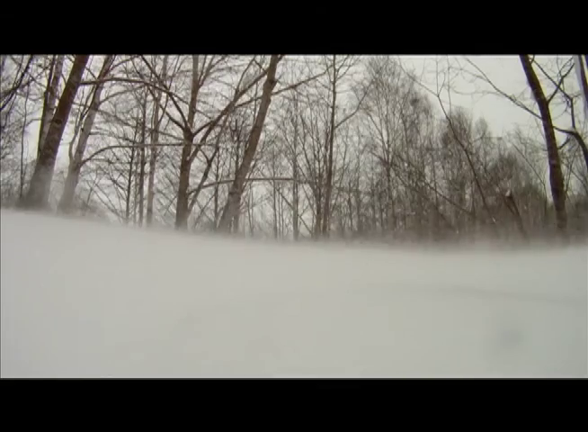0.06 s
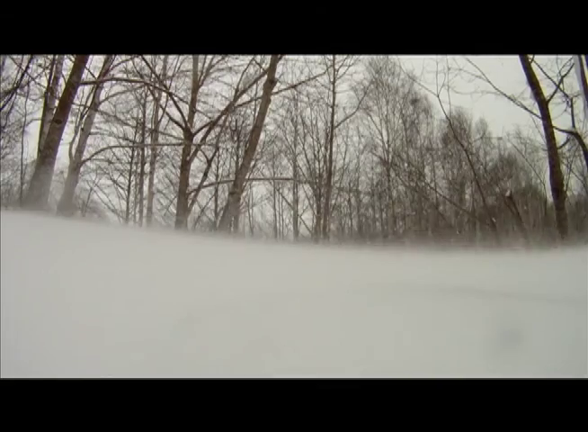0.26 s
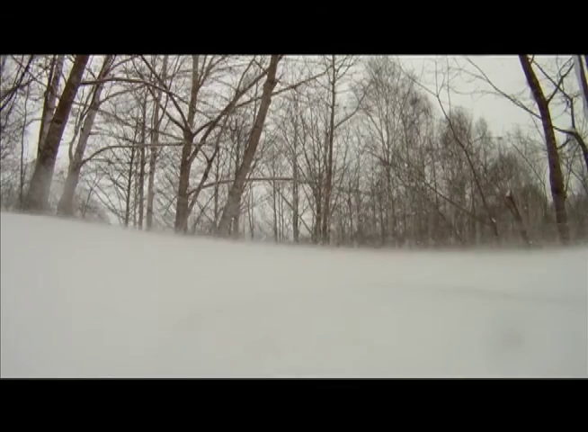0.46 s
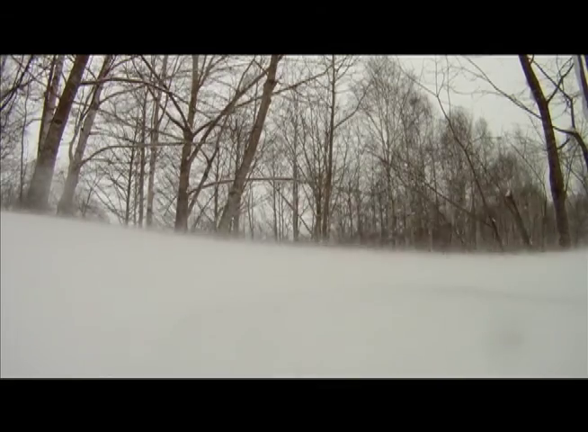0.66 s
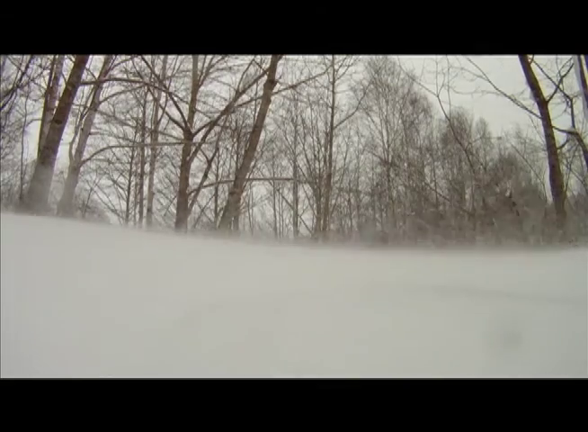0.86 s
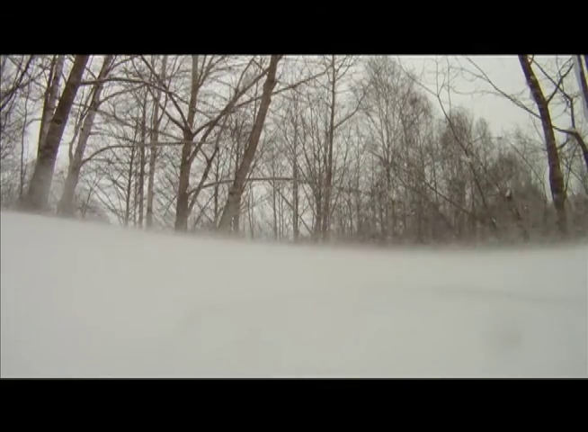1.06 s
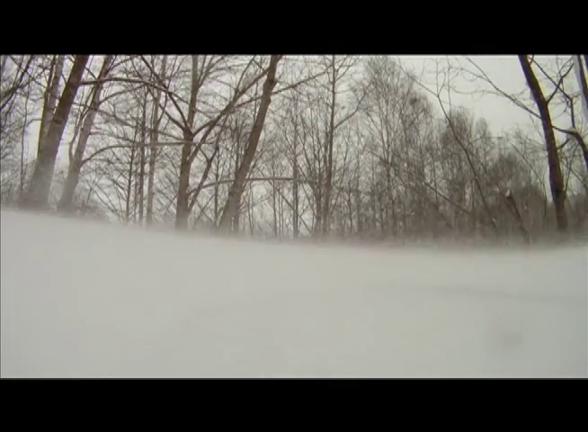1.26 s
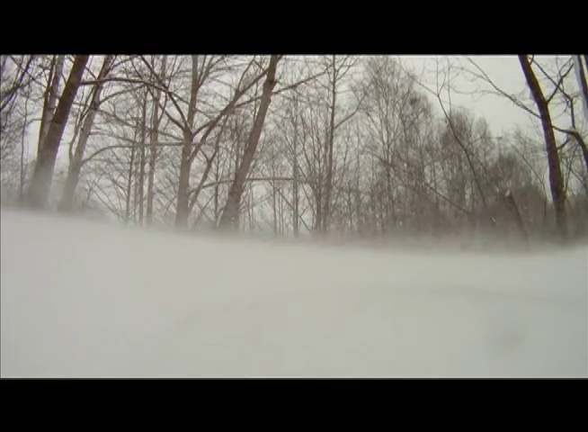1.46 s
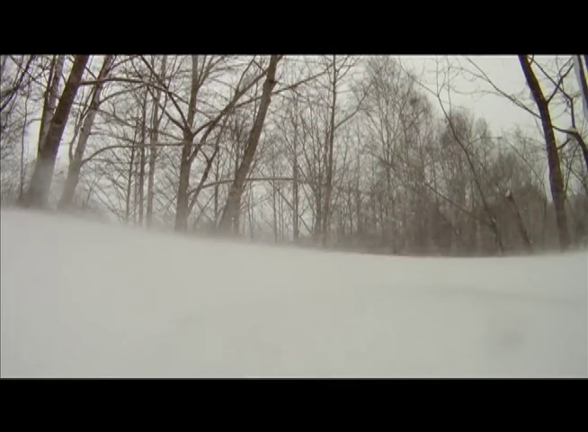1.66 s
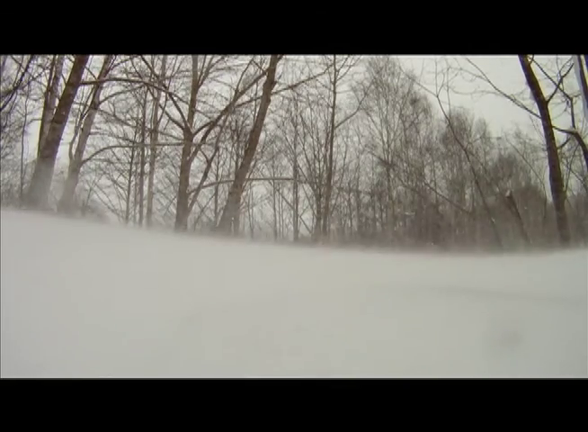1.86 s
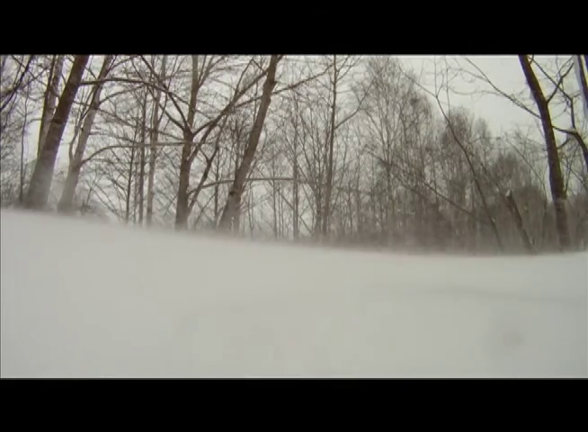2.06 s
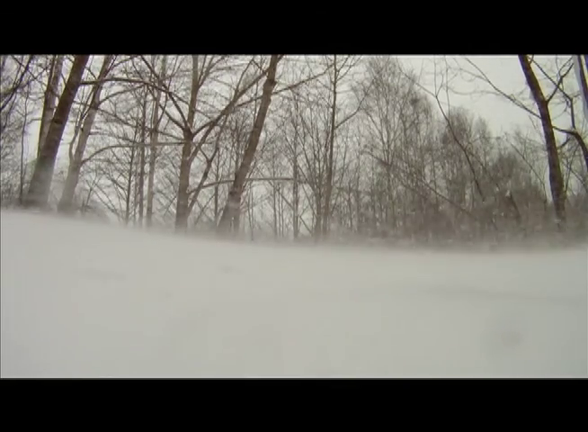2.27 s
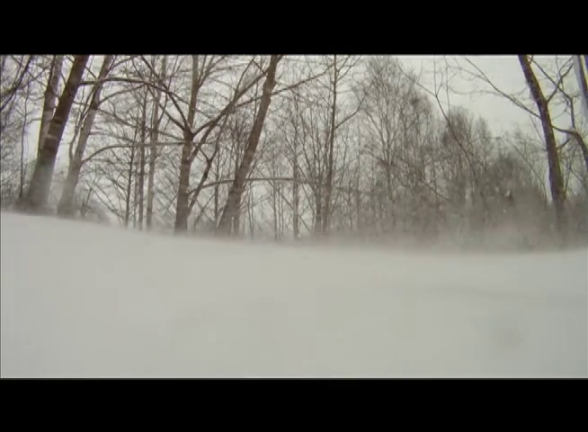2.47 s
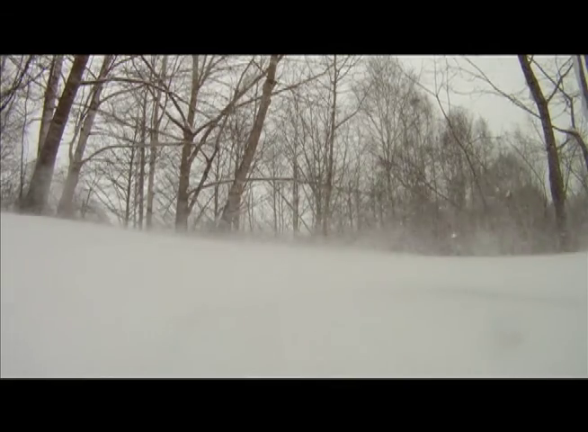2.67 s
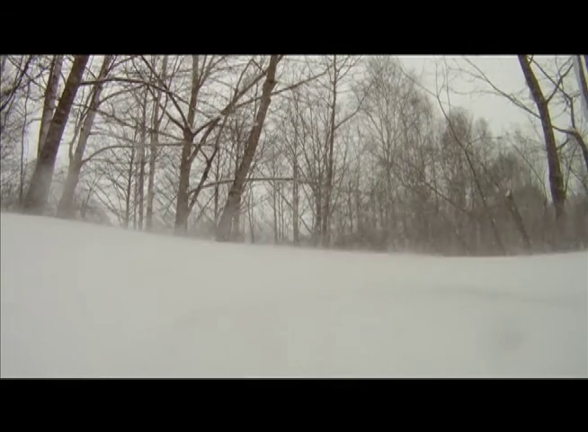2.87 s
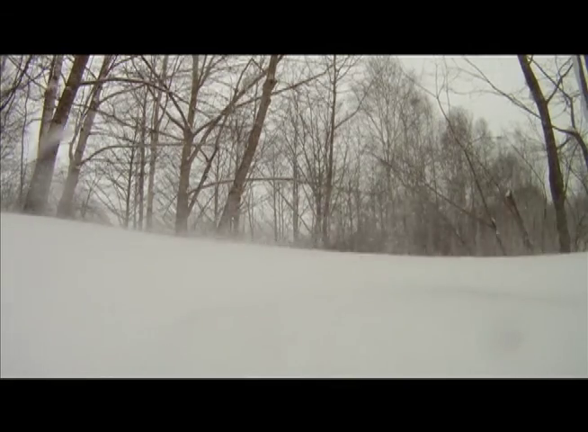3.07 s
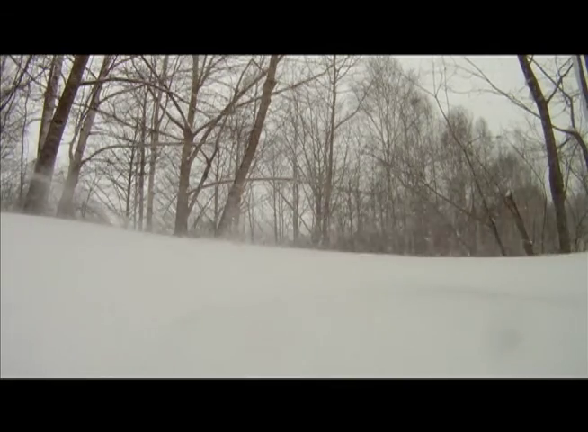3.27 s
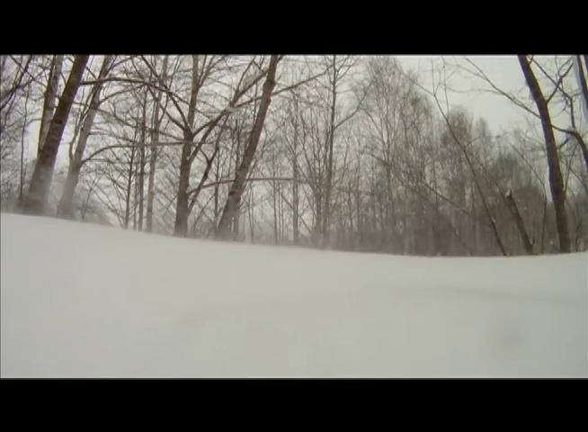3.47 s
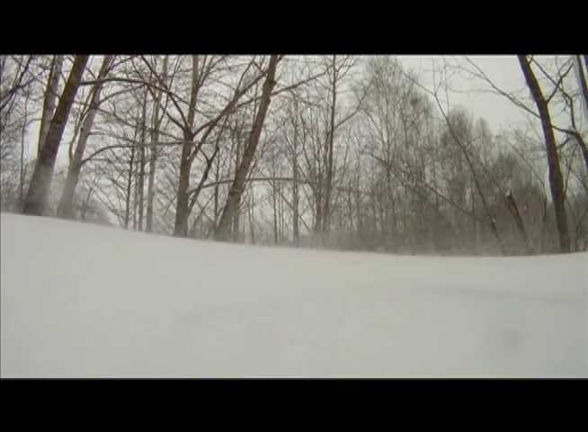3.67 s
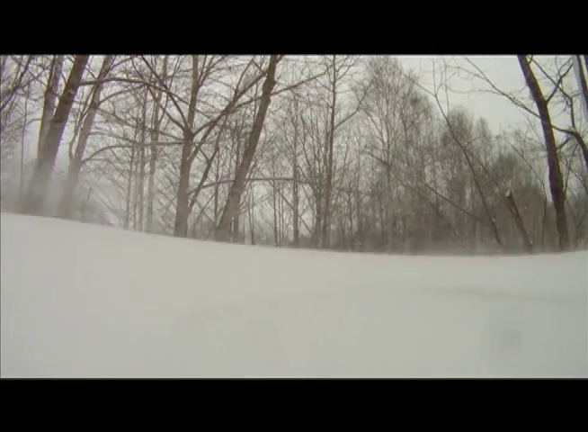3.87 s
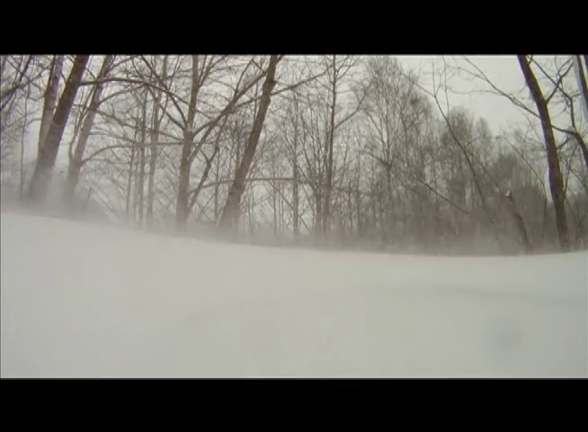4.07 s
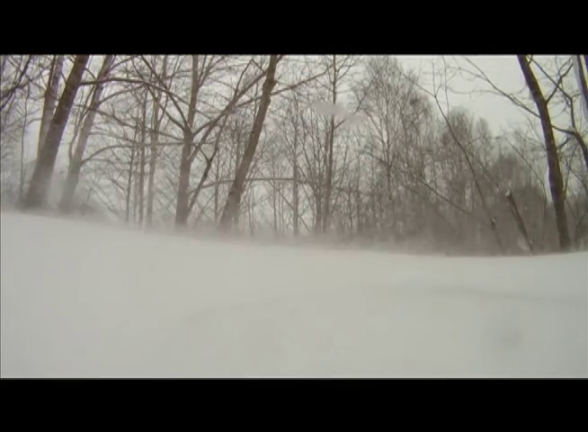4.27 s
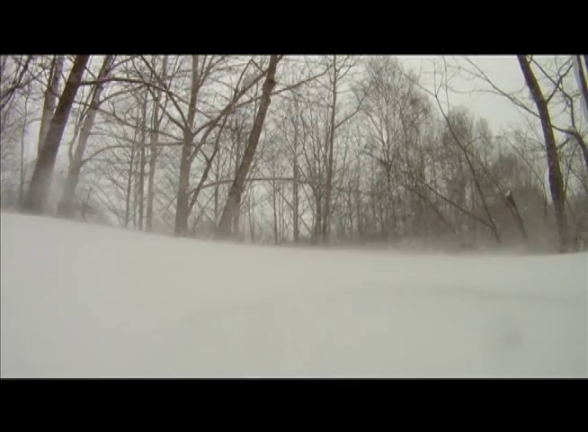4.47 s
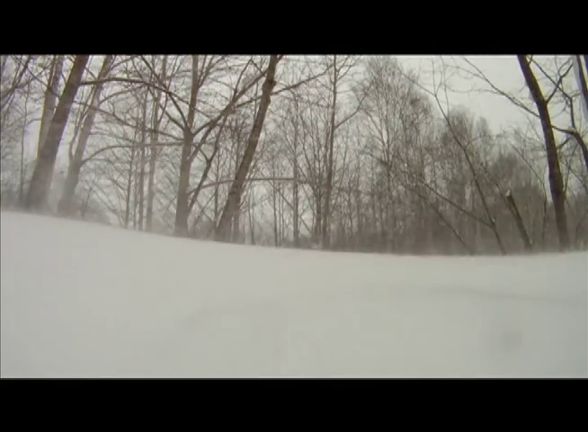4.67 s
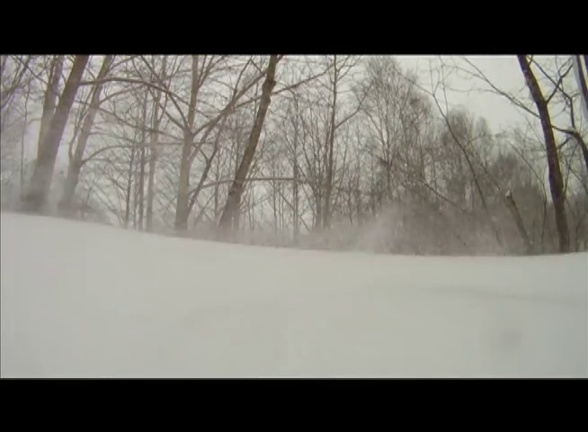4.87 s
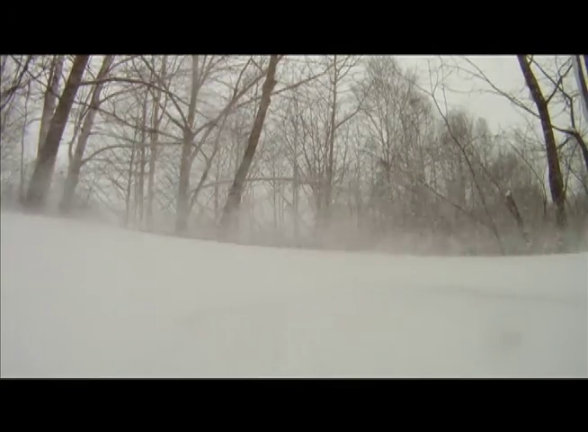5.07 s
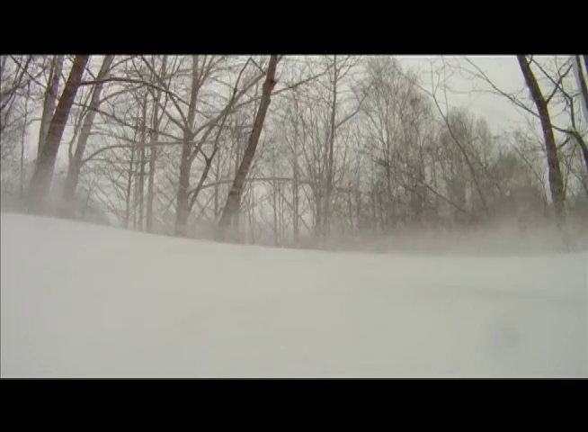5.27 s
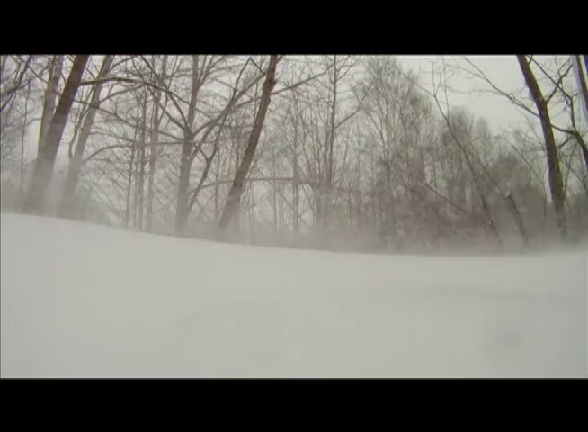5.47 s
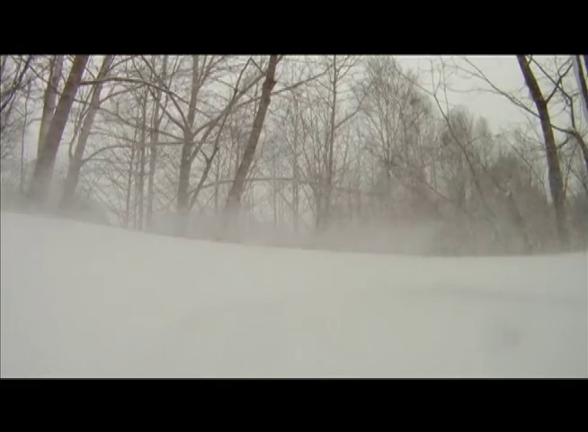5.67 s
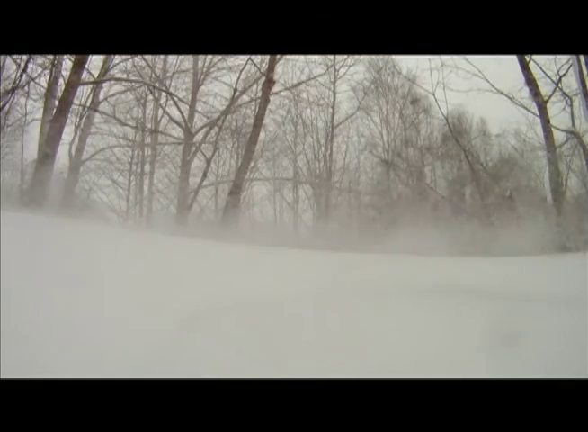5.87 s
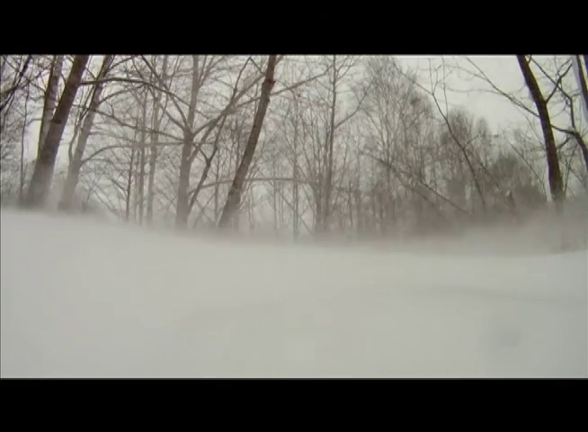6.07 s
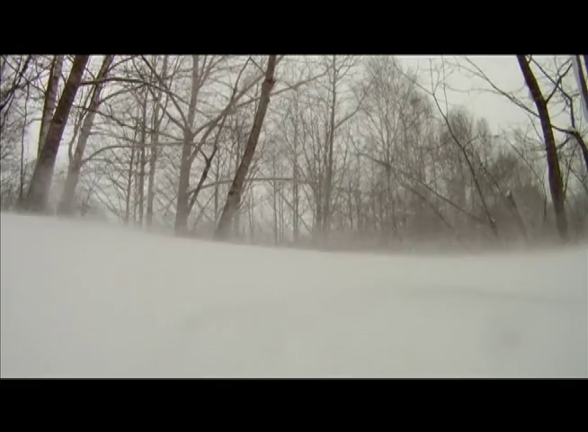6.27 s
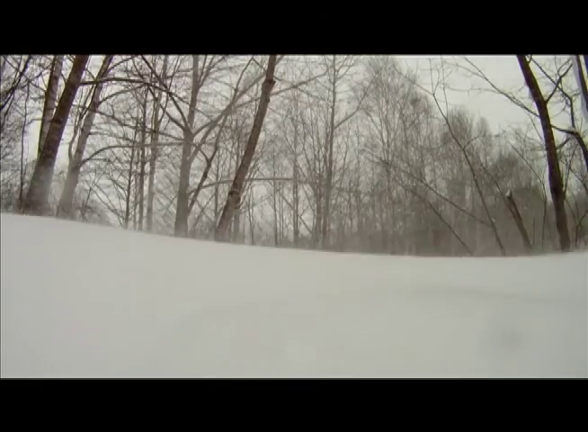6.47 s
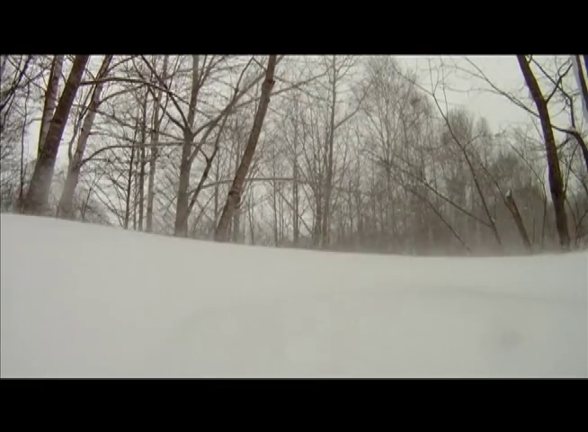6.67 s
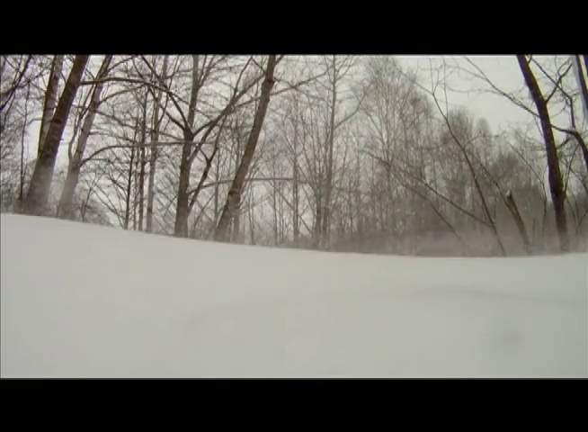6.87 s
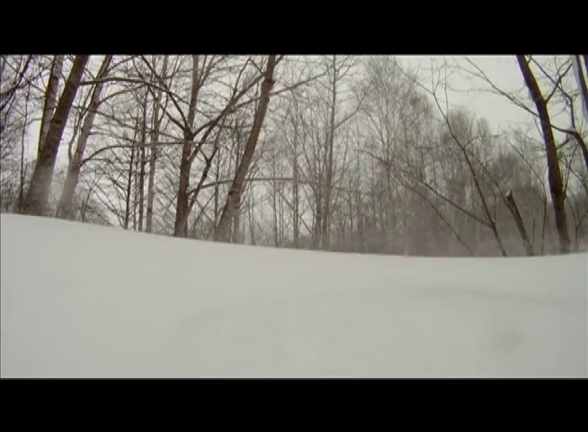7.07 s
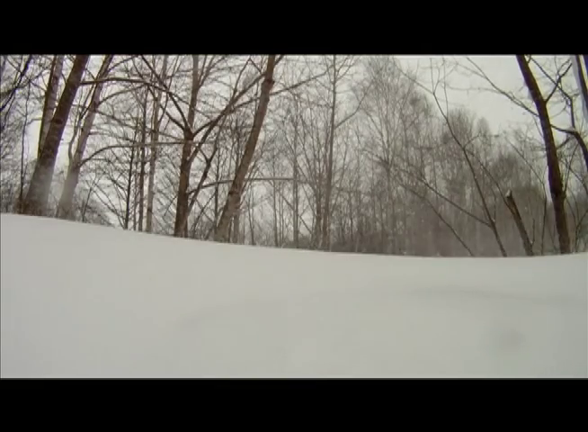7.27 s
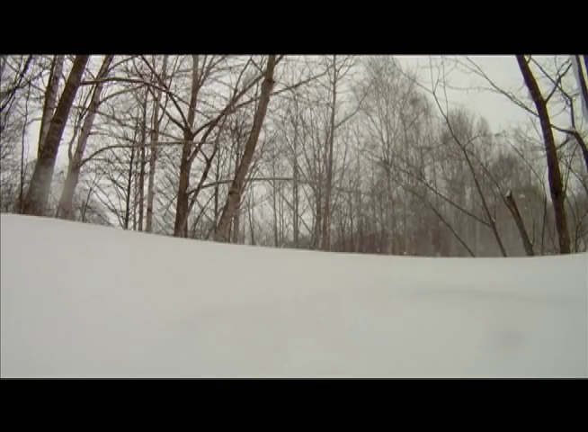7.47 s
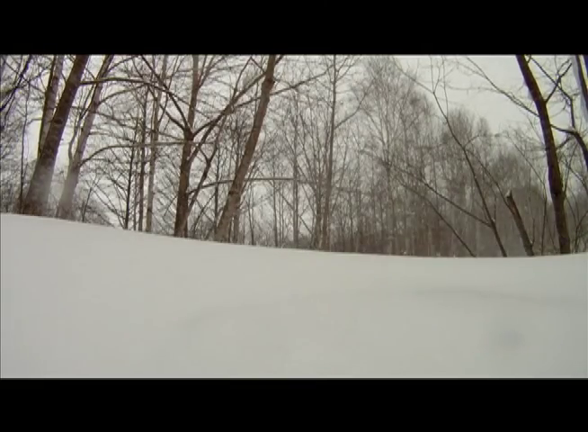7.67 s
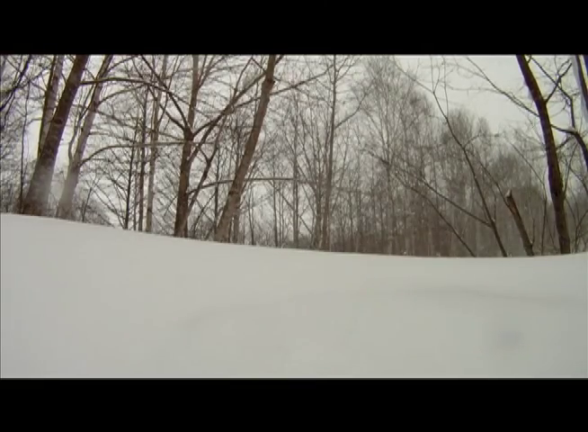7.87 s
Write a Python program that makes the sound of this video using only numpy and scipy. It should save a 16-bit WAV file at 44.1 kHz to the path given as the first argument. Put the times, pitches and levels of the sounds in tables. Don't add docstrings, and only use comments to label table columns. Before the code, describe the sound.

A microphone sealed in a small plastic case lies in blowing snow beside a wood. At the start, low wind pressure thumps and flutters, with scattered hard ticks and short patters. Around 0.9 s a heavy clump cracks loudly on the case, and a dense, crackling spray continues in bursts until about 1.5 s. It thins, then another flurry from 2.2 to 2.8 s brings sharp knocks, crumbling grit and a small glassy ping. From 3 to 4.8 s the wind slackens, leaving sparse ticks and soft puffs. Snow builds again near 4.9 s, becoming a fierce rattling barrage between 5.3 and 6.05 s. It stops quickly; buffeting and a hollow, hissy rush in the trees linger, with a few taps near 6.5 and 7 s. By 7.9 s only faint grains and hiss remain. The sound is close, boxy, and brittle on top.

```python
import sys
import numpy as np
from scipy import signal
from scipy.fft import rfft, irfft, next_fast_len
from scipy.io import wavfile
from scipy.ndimage import uniform_filter1d, map_coordinates

SR = 44100
rng = np.random.default_rng(int(sys.argv[2]) if len(sys.argv) > 2 else 0)


def undo_db(level):
    steps = np.asarray(level, float) / 20
    return 10 ** steps


def wrap_up_sound(samples):
    columns = np.atleast_2d(samples).T
    tamed = np.clip(columns, -1, 1)
    steps = np.round(tamed * 32767).astype(np.int16)
    wavfile.write(sys.argv[1], SR, steps)


N = 349713
CLOCK = np.arange(0, N + 32, 32) / SR


def unit(x):
    return x / np.sqrt(np.mean(x ** 2) + 1e-20)


def steady(x, seconds):
    power = np.abs(uniform_filter1d(x ** 2, size=round(seconds * SR)))
    return x / np.sqrt(power + 1e-9)


def wobble(rate):
    return map_coordinates(rng.standard_normal(N // 100), [np.arange(N) * rate / SR])


def filtered(x, response):
    m = next_fast_len(N + 8192)
    return irfft(rfft(x, m) * response(np.fft.rfftfreq(m, 1 / SR)), m)[..., :N]


def coloured(spectrum, patchy_db):
    z = signal.stft(rng.standard_normal(N), nperseg=512)[2]
    field = uniform_filter1d(rng.standard_normal(z.shape), size=5, axis=0)
    field = uniform_filter1d(field, size=10, axis=1)
    x = signal.istft(z * undo_db(patchy_db * unit(field)), nperseg=512)[1][:N]
    hz, db = np.transpose(spectrum)
    return unit(filtered(x, lambda f: undo_db(np.interp(np.log(f + 1), np.log(hz), db, right=-120))))


def swell(middle_s, peak_db, reach_s):
    return peak_db - 15 * np.abs(CLOCK - middle_s) / reach_s


def summed(rows, swells):
    power = undo_db(np.interp(CLOCK, *rows)) ** 2
    power = power + sum(undo_db(np.maximum(db, -120)) ** 2 for db in swells)
    return np.interp(np.arange(N) / SR, CLOCK, 10 * np.log10(power))


# centre_hz, half_width_hz, lift_db
HOLLOW = [(1090, 126, 4.5), (1510, 120, 1), (2055, 127, 5.5), (2280, 110, 3.5), (2740, 67, 1),
          (3560, 120, 8), (4180, 90, 7), (4980, 110, -4)]


def hollow(hz):
    return undo_db(sum(db * np.exp(-((hz - c) / w) ** 2) for c, w, db in HOLLOW))


# time_s, rush_db
WIND = [(0.1, -56.5), (0.57, -56.5), (1.1, -63), (1.34, -55), (1.94, -64.5), (2.52, -54), (2.69, -59),
        (2.95, -74), (3.24, -72), (3.69, -64.5), (4.55, -69), (5.5, -54), (5.67, -59.5), (6.29, -54.5),
        (6.58, -63.5), (6.78, -55), (7.36, -60.5), (7.93, -83.5)]
# middle_s, slow_pressure_db, flutter_db, reach_s
EDDIES = [(0.0, -37.5, -48, 0.59), (0.2, -29.5, -53, 0.031), (0.62, -36, -55, 0.14),
          (0.748, -66, -50.5, .1), (0.97, -40, -46.5, 0.27), (1.19, -40, -46, 0.19),
          (1.48, -36, -46.5, 0.083), (1.64, -41.5, -74.5, 0.15), (1.92, -42, -56, 0.244),
          (2.22, -47.5, -49, 0.34), (2.31, -40.5, -72, 0.13), (2.45, -40, -64, 0.17),
          (3.66, -44, -59, 0.17), (3.87, -48, -76, 0.23), (4.1, -54.5, -59, 0.32),
          (4.92, -50.5, -54.5, 0.49), (5.23, -44, -53, 0.19), (5.72, -39.5, -51, 0.14),
          (6.01, -37.5, -41.5, 0.11), (6.15, -44.5, -47.5, .15), (6.281, -42, -45, 0.082),
          (6.45, -41, -54, 0.12), (6.63, -63, -52, 0.095), (6.74, -45.5, -43, 0.28), (7.0, -47, -56, 0.23),
          (7.24, -42, -62, 0.25)]
# freq_hz, level_db (per Hz)
SWAY = [(9, -19.5), (20, 1), (29, -11), (40, -20.5), (60, -25), (90, -29)]
# freq_hz, level_db (per Hz)
FLUTTER = [(35, 1.5), (60, 7.5), (110, -2), (210, -12), (360, -13), (700, -53)]
# freq_hz, level_db (per Hz)
RUSH = [(150, -3), (300, -11.5), (700, -15), (1050, -6.5), (1600, -3.5), (2130, -0.5), (2700, -10),
        (3550, -15.5), (5000, -33), (6000, -44)]


def wind():
    s, strength_db = np.transpose(WIND)
    calm_sway_db = strength_db + 1
    calm_flutter_db = -68 + 0.74 * (strength_db - strength_db.mean())
    pressures = [swell(s_mid, db, reach_s) for s_mid, db, _, reach_s in EDDIES]
    flutters = [swell(s_mid, db, 0.14) for s_mid, _, db, _ in EDDIES]
    hisses = [db - 8 for db in flutters]

    sway_db = summed((s, calm_sway_db), pressures)
    flutter_db = summed((s, calm_flutter_db), flutters)
    rush_db = summed((s, strength_db), hisses) + 5.5 + 2.7 * wobble(10)

    sway = steady(coloured(SWAY, patchy_db=4.0), 0.11)
    flutter = steady(undo_db(0.84 * wobble(6.2)) * coloured(FLUTTER, patchy_db=1.7), 0.11)
    rush = steady(filtered(coloured(RUSH, patchy_db=1.73), hollow), 0.2)
    return undo_db(sway_db) * sway + undo_db(flutter_db) * flutter + undo_db(rush_db) * rush


# centre_hz, width_hz, level_db
MAIN_WALL = [(2120, 84, -3.5), (2290, 102, -7), (2354, 234, 1.5)]
LOW_WALLS = [(1130, 116, -21), (1740, 60, -15.5)]
LENS_COVER = [(2920, 330, -15), (3220, 195, -5.5), (3410, 180, -15.5), (3556, 142, -1.5), (3796, 345, -6)]
THIN_RIBS = [(4580, 195, -11), (5065, 136, -8), (4885, 320, -12.5), (5230, 250, -21.5), (4460, 300, -18)]


def ringing(modes, stretch):
    def response(f):
        total = 0
        for centre, width, db in modes:
            damping = 1j * f * width
            total = total + undo_db(db) * damping / ((centre * stretch) ** 2 - f * f + damping)
        return total
    return response


def case(blows, stretch=1):
    stiff_hz = 1190
    top_hz = 6590
    parts = [(MAIN_WALL, stretch), (LOW_WALLS, stretch), (LENS_COVER, 1), (THIN_RIBS, stretch)]
    sound = sum(filtered(b, ringing(*part)) for b, part in zip(blows, parts))

    def body(f):
        stiff = -f * f / (stiff_hz ** 2 - f * f + 0.9j * f * stiff_hz)
        return stiff / (1 + 1j * f / top_hz)
    return filtered(sound, body)


# pitch_hz, t60_s, rise_s
GLASS = (3575, 0.029, 0.0016)


def glass(strikes):
    hz, t60, rise = GLASS
    t = np.arange(SR // 10) / SR
    note = undo_db(-60 * t / t60) * (1 - np.exp(-t / rise)) * np.sin(2 * np.pi * hz * t)
    return signal.fftconvolve(strikes, note)[:N]


def sheet(start_s, length_s, arriving_db, leaving_db):
    front_db_per_s, tail_db_per_s = 704, 402
    t = CLOCK - start_s
    top_db = np.interp(t, [0, length_s], [arriving_db, leaving_db])
    return top_db + front_db_per_s * np.minimum(t, 0) - tail_db_per_s * np.maximum(t - length_s, 0)


# time_s, level_db
DRIFT = [(0.0, -54.5), (0.4, -56), (0.518, -48), (0.72, -52.5), (0.9, -39), (1.6, -58.5), (2.17, -61.5),
         (2.3, -41.5), (2.75, -48), (3.05, -74), (3.5, -59.5), (4.6, -57.5), (5.25, -62), (5.5, -44.5),
         (6.07, -43.5), (6.12, -60.5), (7.33, -67.5), (7.7, -91)]
# middle_s, peak_db, reach_s
PUFFS = [(0.169, -45, 0.11), (0.466, -37, 0.036), (0.564, -46, 0.094), (0.672, -44, 0.027),
         (1.275, -30, 0.052), (1.431, -32, 0.07), (1.819, -37.5, 0.041), (1.37, -28, 0.0076),
         (3.7, -52.5, 0.039), (2.139, -48.5, 0.03), (2.245, -36, 0.011), (2.518, -34, 0.22),
         (2.754, -43.5, 0.059), (2.837, -46, 0.03), (3.295, -40.5, 0.059), (3.629, -46.5, 0.057),
         (3.878, -50, 0.021), (3.962, -46, 0.064), (4.172, -45.5, 0.11), (4.244, -46.5, 0.07),
         (4.414, -45, 0.13), (4.495, -51, 0.04), (4.845, -42.5, 0.14), (5.058, -40, 0.028),
         (5.153, -44.5, 0.11), (5.287, -37, 0.058), (5.464, -32.5, 0.11), (6.07, -41, 0.037),
         (6.747, -49.5, 0.055), (6.84, -56, 0.054), (7.33, -57.5, .05)]
# start_s, length_s, arriving_db, leaving_db
SHEETS = [(0.46, 0.042, -37.5, -41.5), (0.76, 0.088, -45, -35), (0.937, 0.12, -26, -33),
          (1.074, 0.086, -34, -33.5), (1.992, 0.079, -42, -52), (2.211, 0.066, -36, -42.5),
          (2.335, 0.36, -38.5, -40), (3.479, 0.067, -48, -48.5), (2.942, 0.055, -63.5, -57.5),
          (4.913, 0.092, -49.5, -46), (5.331, 0.065, -29, -27.5), (5.531, 0.12, -39.5, -31),
          (5.764, 0.065, -37, -54), (5.836, 0.012, -26.5, -29), (5.906, 0.13, -29, -31.5)]
# middle_s, depth_db, reach_s
LULLS = [(0.7, 3, 0.0223), (1.33, 6, 0.042), (2.268, 11, 0.0094), (3.668, 12, 0.0147), (4.047, 5, 0.008),
         (4.203, 19, 0.019), (4.455, 6, 0.019), (5.02, 2, 0.04), (5.247, 15, 0.013), (5.57, 4, .006),
         (5.715, 14, 0.008), (5.888, 11, 0.01), (5.863, 10, 0.0054), (6.026, 12, 0.015)]


def snow_level():
    flying = [swell(*puff) for puff in PUFFS] + [sheet(*row) for row in SHEETS]
    flying_db = summed(np.transpose(DRIFT), flying)
    shelter_db = sum(db * np.exp(-((CLOCK - s) / reach_s) ** 2) for s, db, reach_s in LULLS)
    return flying_db - np.interp(np.arange(N) / SR, CLOCK, shelter_db)


def snow_stream():
    level_db = snow_level()
    flurry = wobble(60)
    per_second = 2600 * undo_db(0.25 * (level_db + 44.5) + 2.2 * flurry)
    lands = rng.random(N) < per_second / SR
    size_db = 1.9 * np.minimum(rng.exponential(size=N), 1.9) + 0.18 * flurry
    grains = lands * undo_db(size_db) * np.sign(rng.standard_normal(N))

    chance = rng.standard_normal((4, N))
    wander = unit(uniform_filter1d(chance, size=round(0.03 * SR), axis=1))
    blows = grains * undo_db(3.2 * chance + 3 * wander)

    spot = rng.random(N)
    on_window, on_rim = spot < 0.015, spot > 0.5
    stretch = 0.035
    plastic = unit(case(blows * on_rim, 1 + stretch) + case(blows * ~on_rim, 1 - stretch))
    patter = plastic + undo_db(-24) * unit(glass(grains * on_window))
    return undo_db(level_db - 0.5) * steady(patter, 0.049)


# time_s, peak_db, bright_parts_over_main_wall_db
PLACED = [(0.0207, -41, -15), (0.89, -25, 10), (0.992, -23, 0), (1.0146, -21, 4), (1.1086, -22, 1),
          (1.1297, -22.5, 6), (1.2507, -22, -6), (1.4085, -27, 4), (1.5777, -34, -13), (1.9992, -27, 14),
          (2.3195, -32, -10), (2.6897, -25, 6), (3.7475, -47, -4), (3.9023, -39, -3), (4.6078, -40, 7),
          (4.6207, -43, 0), (4.6476, -34, 12), (4.7787, -38, -6), (4.8738, -31, -1), (5.048, -37, 3),
          (5.1106, -33, 0), (5.5075, -31, 0), (5.736, -29.5, -7), (5.819, -28, -3), (5.9143, -26, 0),
          (6.3087, -40, -15), (6.7285, -32, -18), (7.2574, -36, -2), (1.0648, -23, -2), (3.2396, -43, 0),
          (4.069, -42, 0)]


def placed():
    blows = np.zeros((4, N))
    for s, db, bright_db in PLACED:
        share_db = np.minimum(0, bright_db * np.array([-1, -1, 1, 1]))
        blows[:, round(s * SR)] = undo_db(db + np.array([23.7, 10, 23.5, 27]) + share_db)
    return blows


# time_s, peak_db, lens_cover_db (higher when they land near it)
HEAVY = [(0.5135, -21.5, -20.5), (0.5476, -23.5, -14), (0.9188, -9, -10.5), (0.9694, -16, -11.5),
         (1.1416, -25.5, -8), (1.186, -24, -12), (1.246, -19.5, -22), (1.372, -24, -14),
         (1.3924, -18.5, -9.5), (1.4257, -21, -10), (2.2246, -18.5, -18), (2.2541, -16, -13),
         (2.3422, -13.5, -16.5), (2.3967, -18, -31), (2.5568, -20, -37.5), (2.6197, -21.5, -38),
         (2.6724, -14.5, -21), (3.994, -27.5, -13.5), (5.3288, -15.5, -12.5), (5.3577, -24, -0.5),
         (5.3767, -32, -19), (5.5767, -25, -16), (5.602, -23.5, -6), (5.789, -23, -18),
         (5.874, -17.5, -15.5), (5.9045, -18.5, -11), (5.9245, -21.5, -8), (5.9512, -18, -27),
         (5.992, -22.5, -1.5), (5.9443, -21, -17)]
# time_s, peak_db, lens_cover_db
LIGHT = [(0.13, -27.5, -19), (0.4373, -35, -9), (0.4499, -33, -4), (0.625, -32.5, -7), (0.6682, -35, -4),
         (0.7368, -37, -6), (0.84, -32, -11), (0.8827, -23, -14), (1.065, -36, -11), (1.2203, -28.5, -14),
         (1.4641, -30, -7), (1.5467, -30.5, -20.5), (1.709, -24.5, -24), (1.9733, -35, -9),
         (2.1258, -23.5, -28.5), (2.205, -28.5, -7.5), (2.445, -20, -37), (2.761, -24.5, -38),
         (2.8537, -32, -11), (4.116, -34, -20.5), (4.283, -43.5, 4), (4.396, -41.5, 2.5), (4.824, -28, -36),
         (4.9106, -29, -23), (5.16, -37.5, -0.5), (5.4298, -26, -5), (5.5194, -35.5, 2),
         (6.6079, -38, -2.5), (6.9567, -24, -33), (7.85, -40, -13), (6.515, -24.5, -10)]
# time_s, peak_db, lens_cover_db
LOW = [(0.0307, -28.5, -24), (0.165, -24, -24.5), (0.344, -32, -7), (1.638, -32, -37.5), (1.8, -29, -20),
       (2.8132, -24, -39), (3.079, -40, -12.5), (3.2808, -32, -33), (3.5012, -32, -15), (3.782, -33, -20),
       (4.9662, -30, -16), (5.2637, -30.5, -18), (5.843, -14.5, -25), (6.8653, -30, -24),
       (7.3054, -35, -13)]
# low_walls_db, crumbling_db, crumbling_t60_s
LANDING = [
    (-26, -7, 0.078),
    (-35, -1, 0.012),
    (-12.5, -9, 0.05),
]


def clumps():
    brittle_hz = 1410
    ribs_db = -4
    lead_s, lead_db = 0.00179, -19.5
    crumbs_per_s = 900
    blows = np.zeros((4, N + SR))
    t = np.arange(SR // 16) / SR
    for hits, (low_db, crumbling_db, t60) in zip((HEAVY, LIGHT, LOW), LANDING):
        for s, db, cover_db in hits:
            pieces = np.tanh(rng.standard_normal((4, len(t)))) * (rng.random(len(t)) < crumbs_per_s / SR)
            crumbs = undo_db(crumbling_db - 60 * t / t60) * pieces
            crumbs[:, 0] = 1
            parts_db = np.array([0, low_db, cover_db, cover_db + ribs_db])
            strength = undo_db(db + 22.0 + parts_db + np.array([0.85, 33.5, 13.5, 21.44]))
            start = round(s * SR)
            blows[:, start:start + len(t)] += strength[:, None] * crumbs
            blows[:, round((s - lead_s) * SR)] -= undo_db(lead_db) * strength

    def brittle(f):
        return -f * f / (brittle_hz ** 2 - f * f + 1.2j * f * brittle_hz)
    blows[0, :N] = filtered(blows[0, :N], brittle)
    return case(blows[:, :N])


# time_s,
# peak_db
SINGLE_GRAINS = [(0.0494, -45), (0.0866, -51), (0.1344, -35), (0.1484, -40), (0.1529, -27), (0.1591, -29),
                 (0.3085, -43), (0.3773, -38), (0.3832, -42), (0.5555, -36), (0.5665, -30), (0.6193, -38),
                 (0.6642, -33), (0.766, -40), (1.0326, -24.5), (1.0449, -27), (1.0693, -37), (1.2115, -32),
                 (1.3322, -48), (1.3434, -33), (1.3751, -24), (1.4756, -29.0), (1.523, -43), (1.67, -44),
                 (1.7046, -37), (1.7612, -42), (1.7872, -32), (1.893, -40), (1.9017, -45), (1.9246, -41),
                 (1.977, -35), (2.06, -43), (2.0653, -42.5), (2.1065, -44), (2.1419, -42), (2.159, -41),
                 (2.1925, -32), (2.3973, -24), (2.413, -31), (2.4707, -30), (2.679, -31), (2.741, -37),
                 (2.7819, -43), (2.827, -43), (2.8321, -35), (2.8413, -31), (2.8907, -52), (2.8954, -41),
                 (2.936, -55), (2.9523, -50), (2.962, -41.5), (3.1713, -55.6), (3.2264, -46.7),
                (3.2317, -44), (3.3261, -38.5), (3.3736, -52), (3.3865, -41.5), (3.431, -45), (3.4385, -43),
                (3.4846, -46), (3.5068, -34), (3.5347, -40), (3.5724, -41), (3.6187, -42), (3.631, -41),
                (3.6412, -38), (3.6627, -44), (3.6699, -44), (3.7001, -37.5), (3.7974, -41), (3.772, -41),
                (3.7852, -42), (4.277, -41), (3.868, -40), (3.9049, -43), (3.931, -41), (3.9513, -34),
                (3.9754, -40), (4.0246, -40), (4.1087, -49), (4.1448, -42.8), (4.2097, -47),
                (4.2914, -37.5), (4.3307, -43), (4.3368, -39), (4.3423, -42), (4.4352, -45), (4.5187, -47),
                (4.5312, -52), (4.4262, -42), (4.593, -44.6),
                 (4.3588, -42), (4.6592, -43), (4.6811, -53), (4.8866, -38), (5.0423, -42), (5.2161, -44),
               (5.2658, -35), (5.3049, -34), (5.4551, -25.5), (5.491, -29.2), (5.5002, -30),
               (5.5868, -20.5), (5.6536, -24), (5.7913, -28), (5.8123, -27), (5.9285, -16.5), (5.9976, -17),
               (6.0086, -23), (6.0822, -28), (6.1258, -43), (6.163, -44), (6.2678, -40), (6.3339, -48),
               (6.36, -53), (6.3917, -55), (6.5616, -45), (6.6848, -44), (6.7534, -40.1), (6.8452, -55),
               (6.8564, -45), (6.9679, -46), (6.9884, -51.6), (7.023, -54), (7.0497, -45), (7.0876, -44.5),
               (7.1488, -55), (7.248, -47), (7.271, -44), (7.5229, -54), (7.5374, -53),
                 (0.139, -41), (0.4381, -34), (0.5099, -30), (0.5976, -49), (0.6075, -36), (0.6416, -36.8),
               (0.6686, -26.5), (0.8365, -37), (0.8432, -27.5), (0.8609, -31.5), (0.9467, -21.6),
               (0.9539, -21), (1.1969, -29), (1.2909, -38), (1.4683, -37), (1.4997, -34), (1.7566, -48),
               (1.8748, -46), (1.8796, -44), (1.9878, -39), (2.2003, -34), (2.2198, -24), (2.2505, -30),
               (2.3664, -28), (2.4167, -34), (2.628, -39), (2.632, -31), (3.2714, -51), (3.4006, -50),
               (3.8952, -46.9), (3.9998, -32), (4.3829, -50), (4.6386, -48.5), (4.7256, -44.5),
               (4.7518, -41), (4.772, -44.3), (4.8335, -37.8), (4.879, -43), (4.8887, -32), (5.1687, -38),
               (5.3445, -34), (5.4031, -27), (5.4285, -26), (5.446, -29), (5.5258, -28), (5.5562, -29),
               (5.58, -23), (5.5837, -29), (5.863, -32), (5.9013, -23), (5.9683, -23), (6.0267, -24),
               (6.0648, -28), (6.3259, -48), (6.2791, -44), (6.2943, -48), (6.5213, -41), (7.2444, -44),
               (7.3603, -56), (7.8585, -54)]


def sleet():
    blows = np.zeros((4, N))
    for s, db in SINGLE_GRAINS:
        place, chip = rng.standard_normal((2, 4))
        at = round(s * SR)
        chip_at = round((s + 0.0012 * chip[0]) * SR) + 1
        blows[:, at] = undo_db(db + np.array([23, 10, 24.6, 25.2]) + 3.6 * place)
        blows[:, chip_at] += blows[:, at] * 0.98 * chip
    return blows


# time_s, peak_db
TICKS = [(0.096, -29.5), (0.3152, -38.5), (0.408, -36), (0.4155, -37), (0.467, -28.5), (0.4771, -22.5),
         (0.5546, -39), (0.643, -40.5), (0.707, -39), (0.729, -34), (0.7558, -48), (0.9054, -26),
         (1.8197, -28), (1.884, -43), (2.081, -39), (2.1046, -49), (2.183, -35), (2.308, -34),
         (3.423, -47.5), (3.6865, -40), (3.82, -40), (4.231, -48), (4.6515, -40), (5.138, -53),
         (5.314, -27), (5.5534, -31), (5.7214, -43), (6.029, -22), (6.0878, -26), (6.2437, -43)]
# time_s, peak_db
STRAGGLERS = [
    (6.1822, -33.5),
    (6.4692, -52),
    (6.5392, -39),
    (6.7526, -53),
    (6.8177, -46),
    (6.909, -46),
    (7.1006, -44),
    (7.3156, -42),
    (7.7318, -54.5),
    (7.812, -48),
]


def stragglers():
    blows = np.zeros((4, N))
    for s, db in STRAGGLERS + TICKS:
        place_db = 9 * rng.standard_normal(4)
        blows[:, round(s * SR)] = undo_db(db + np.array([18.0, 8, 20.8, 23.2]) + place_db)
    return blows


# time_s, peak_db
PINGS = [(0.163, -40), (0.2299, -40.5), (0.3456, -37.5), (0.45, -40), (2.47, -40), (0.52, -46),
         (0.556, -40), (0.5744, -42), (0.61, -45), (0.7377, -37), (1.07, -43), (1.1702, -31.5),
         (2.0324, -43.5), (2.2364, -43), (2.576, -45), (2.7616, -31.5), (2.8809, -51), (4.1044, -58.5),
         (4.1719, -43.5), (4.965, -45), (4.8419, -37.5), (5.5473, -37), (6.27, -57), (6.85, -60),
         (6.9905, -51), (1.575, -53), (3.57, -50)]


def pings():
    strikes = np.zeros(N)
    for s, db in PINGS:
        strikes[round(s * SR)] = undo_db(db + 10.5)
    return glass(strikes)


# middle_s, pitch_hz, peak_db, reach_s
KNOCKS = [
    (0.97, 75, -47.5, .04),
    (1.47, 62, -40.5, 0.048),
    (2.225, 82, -45, 0.041),
    (3.97, 59.4, -53.5, .05),
    (5.45, 47, -47, .07),
    (5.72, 55, -43.5, 0.044),
    (6.02, 62, -43.5, 0.061),
    (6.72, 85, -43.5, 0.036),
    (7.08, 85.1, -49.5, 0.04),
]


def knocks():
    t = np.arange(N) / SR
    sound = np.zeros(N)
    for s, hz, db, reach_s in KNOCKS:
        sound += undo_db(db) * np.exp(-((t - s) / reach_s) ** 2) * np.sin(2 * np.pi * hz * t)
    return sound


def scene():
    air = wind() + knocks()
    snow = snow_stream() + clumps() + pings()
    lone_grains = case(placed() + sleet() + stragglers())
    return (air + snow + lone_grains)[None]


def masked(x):
    hz, _, z = signal.stft(x[0], SR, nperseg=2048)

    def power(lo, hi):
        return np.mean(np.abs(z[(hz >= lo) & (hz < hi)]) ** 2, axis=0)

    def drifting(size):
        return unit(uniform_filter1d(rng.standard_normal(z.shape[1]), size=size))

    loud = power(7000, 10500)
    mood = drifting(4)
    for lo in range(11050, 13400, 170):
        threshold_db = -25 + 3.5 * (mood + drifting(3))
        z[(hz >= lo) & (hz < lo + 170)] *= power(lo, lo + 170) > undo_db(threshold_db) ** 2 * loud
    top = power(15350, 15900)
    usual = np.exp(uniform_filter1d(np.log(top + 1e-20), size=9))
    z[hz > 15350] *= top > undo_db(1.5) ** 2 * usual
    return signal.istft(z, SR, nperseg=2048)[1][None, :N]


def roll_off(x):
    return signal.sosfilt(signal.butter(12, 15830, fs=SR, output="sos"), x)


# freq_hz, level_db (per Hz)
HISS = [(100, -1), (500, -10), (2000, -18.5), (5000, -20), (6000, -30)]


def record(dry):
    noisy = dry + undo_db(-63) * coloured(HISS, patchy_db=1.1)
    edged = filtered(noisy, lambda hz: undo_db(-3 * np.exp(-((hz - 6000) / 110) ** 2)))
    slow = signal.resample_poly(edged, 40, 147, axis=1)
    held = np.repeat(slow, 4, axis=1)
    mirrored = signal.resample_poly(held, 147, 160, axis=1)[:, :N]

    def band_limit(hz):
        return undo_db(-20 * np.clip((hz - 15250) / 100, 0, 1) - 0.025 * np.clip(hz - 15300, 0, 4000))
    finished = masked(filtered(mirrored, band_limit))
    return roll_off(finished)


dry = scene()
out = record(dry)
wrap_up_sound(out)
```